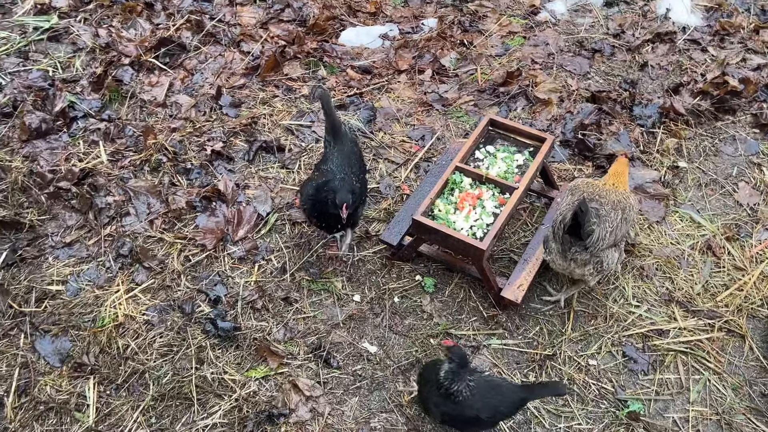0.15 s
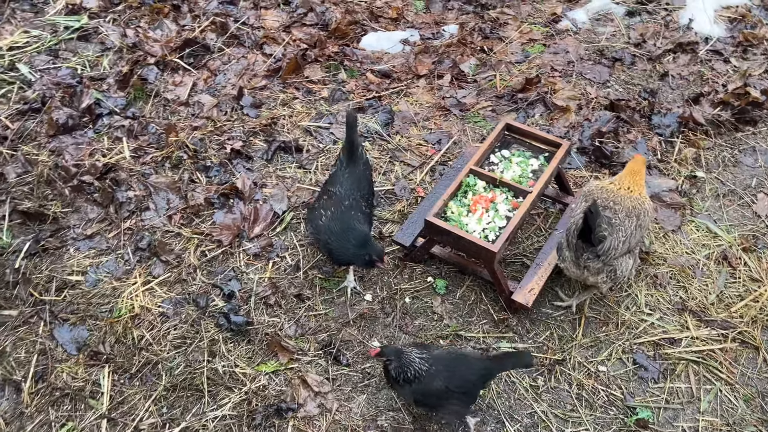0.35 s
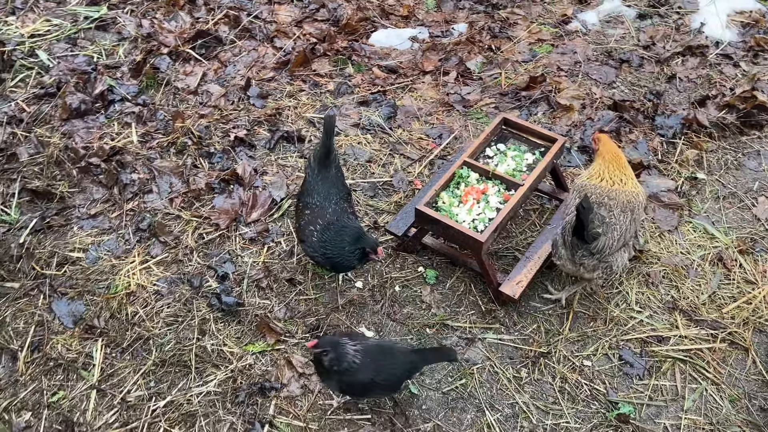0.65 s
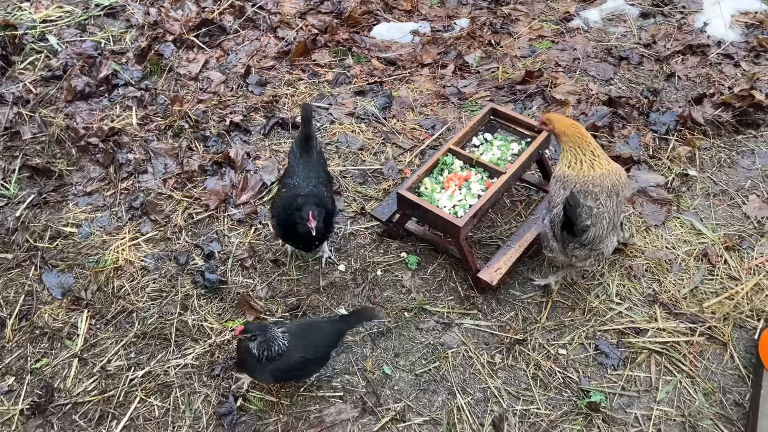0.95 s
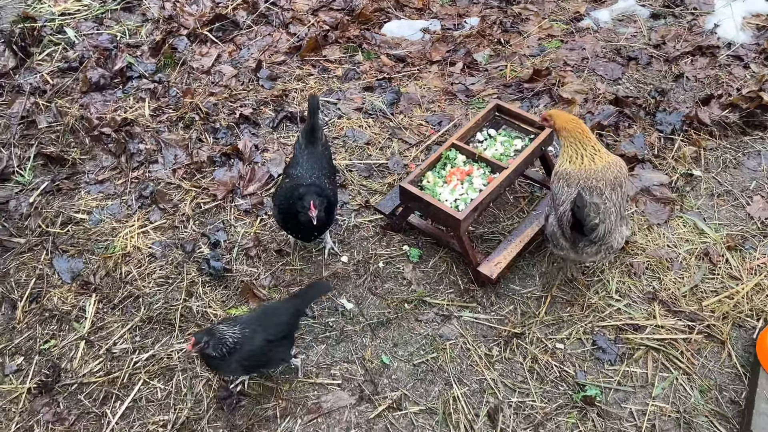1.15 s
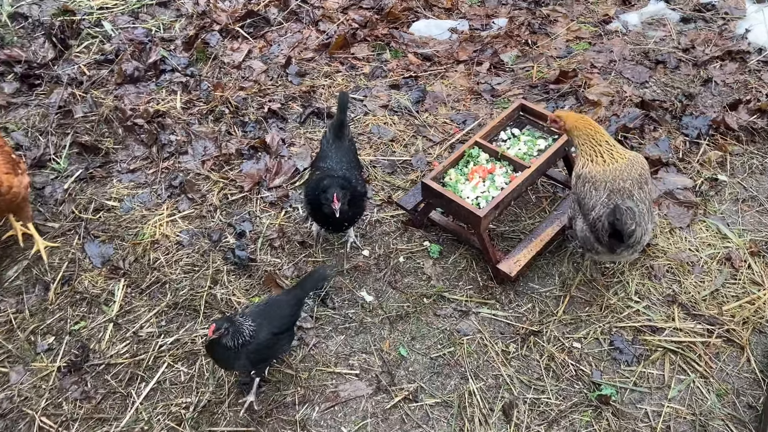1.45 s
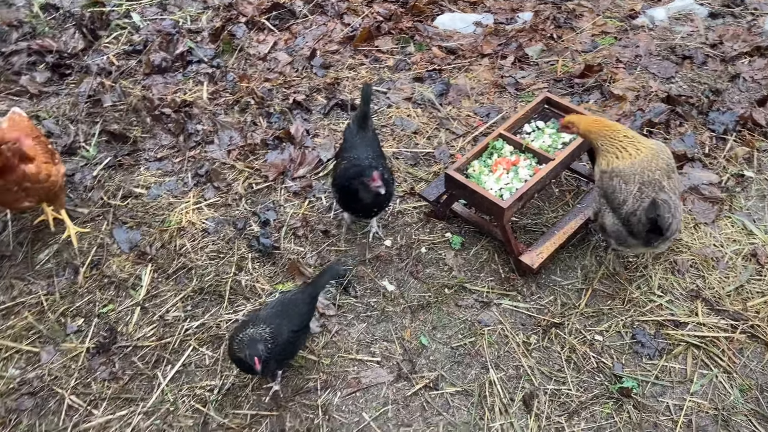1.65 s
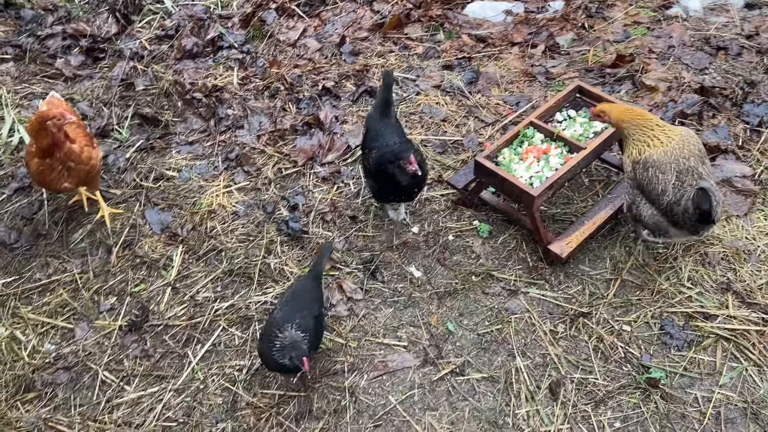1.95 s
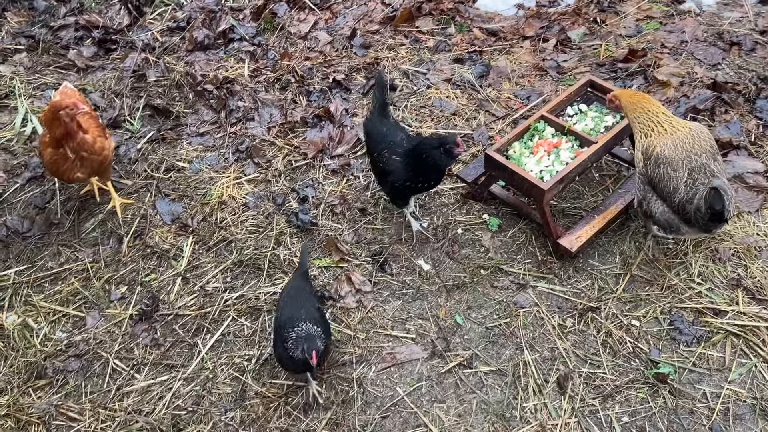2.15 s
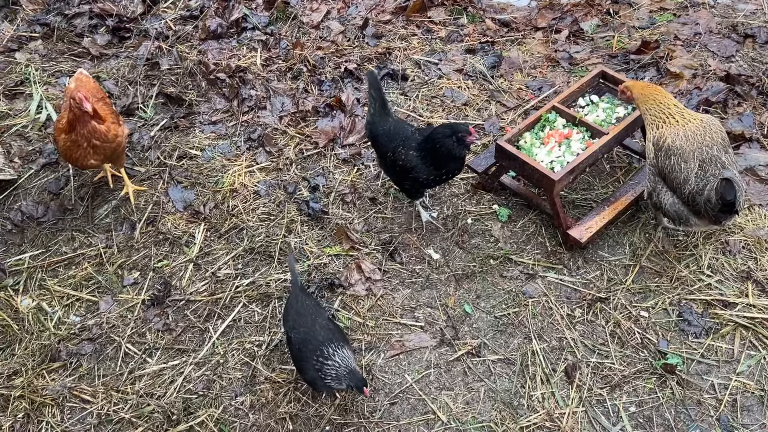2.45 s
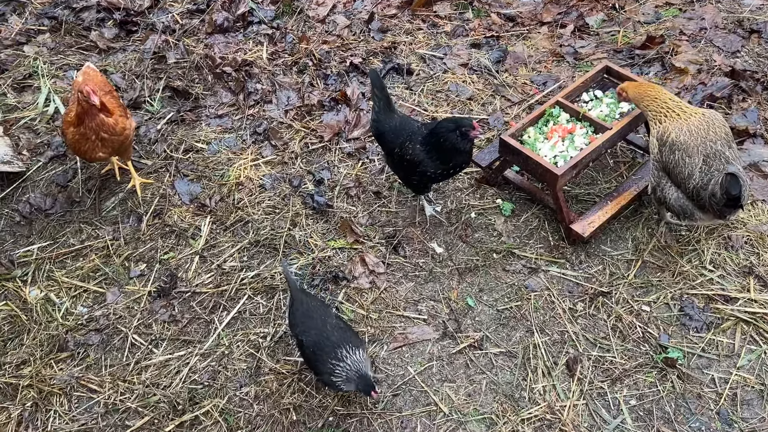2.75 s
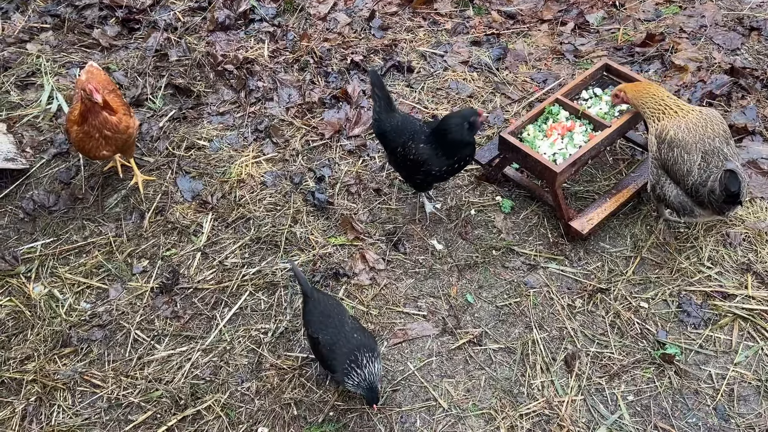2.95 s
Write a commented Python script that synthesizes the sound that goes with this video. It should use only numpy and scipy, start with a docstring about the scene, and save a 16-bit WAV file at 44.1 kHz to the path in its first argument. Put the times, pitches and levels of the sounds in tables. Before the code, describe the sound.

A nearby hen squawks twice, each low voice cracking into a long raspy squeal, after two faint bird whistles. Dull thumps and swelling low rumble accompany it outdoors, picked up in close stereo.

```python
"""Two thin whistles of a small far bird, towards the left, open over low outdoor noise that swells and sinks.
Then a close hen gives two squawks: low voice breaking into a rising squeal that catches and dips, with rasping air.
A second hen moans softly under the first squawk; dull thumps and a late bright tick sound in the yard.
Voices are sums of unsteady harmonics and half lines; thumps are decaying sines with noise; the rest,
apart from the whistled sines, is shaped noise."""
import sys
import numpy as np
from scipy import signal
from scipy.fft import rfft, irfft
from scipy.io import wavfile

SR = 44100
rng = np.random.default_rng(int(sys.argv[2]) if len(sys.argv) > 2 else 0)


def generate_wav(signal):
    """Clip the signal to [-1, 1] and save it as 16-bit WAV at the path in sys.argv[1]."""
    frames = np.transpose(np.atleast_2d(signal))
    scaled = np.clip(frames, -1, 1) * 32767
    pcm = np.round(scaled).astype(np.int16)
    wavfile.write(sys.argv[1], SR, pcm)


N = 136710
TIME = np.arange(N) / SR
CUTOFF_HZ = 15800


def scene():
    """The hens, the thumps, the tick, the far bird and the outdoor noise, in stereo."""
    return hen() + second_hen() + thumps() + ticks() + far_bird() + outdoors()


def hen():
    """Both squawks, the register cracks and the rasp, heard directly and as scatter from the yard."""
    calls = first_squawk() + second_squawk() + cracks() + rasp()
    return at_the_ports(calls) + yard(calls)


# Parts of the first squawk. Each row: time in s, pitch in Hz, level in dB, roughness 0-1.
OPENING_PART = [(.178, 543.7, -43, 0.13), (.255, 606, -36, 0.09), (.322, 640, -35.5, 0.17),
                (.333, 798, -31, 0.03), (.364, 837, -36.5, 0.56)]
HOARSE_PART = [(.368, 1226, -46, 0.37), (.42, 1051, -37, 0.31), (.495, 1262, -46, 0.52),
               (.533, 1264, -47.5, 0.29), (.56, 1129, -35.5, 0.09), (.62, 1249, -47, 0.59),
               (.688, 1293, -50.5, 0.29), (.702, 1129, -34.5, 0.51), (.72, 1325, -52, 0.36),
               (.76, 1360, -46, 0.57)]
FIRST_SQUEAL_PART = [(.765, 1348, -48.5, 0.57), (.83, 1317, -37.5, 0.15), (.89, 1358, -34, 0.044),
                     (1.19, 1386, -31, 0.1), (1.46, 1443, -30.5, 0.15), (1.61, 1464, -28, 0.19),
                     (1.675, 1419, -25.5, 0.08), (1.698, 1326, -29, .35)]
# Throat colour of each part. Each row: frequency in Hz, gain in dB.
OPENING_THROAT = [(600, -20), (1250, -2.5), (1650, 7.5), (1950, 1), (2600, 13), (8000, -34)]
HOARSE_THROAT = [(600, 18), (1150, 13), (2250, 15.5), (3500, -16), (7500, -58), (15000, -46)]
FIRST_SQUEAL_THROAT = [(700, -8), (1350, 9.5), (2750, -0.5), (4200, -12), (5600, -17), (6900, -9.5),
                       (8300, -26.5), (15000, -47.5)]
# Catches of both squeals: momentary pitch drops. Each row: centre in s, length in s.
SQUEAL_CATCHES = [(0.848, .012), (.922, .013), (1.131, 0.019), (1.232, .008), (1.269, 0.0079), (1.634, .01),
                  (1.646, 0.0076), (2.209, 0.0058), (2.259, 0.0094), (2.282, 0.021), (2.324, .015),
                  (2.344, 0.0086), (2.414, .028), (2.502, .009), (2.556, 0.0088), (2.595, 0.0068),
                  (2.631, 0.0074), (2.681, 0.014)]
WOBBLE = .016  # relative pitch deviation, rms before its upper limit


def first_squawk():
    """A low opening, a hoarse stretch and a squeal, each with its own throat resonance."""
    opening = voice(OPENING_PART, OPENING_THROAT, rag=1.0, fall_db=16.5, soft_dull=0.44)
    hoarse = voice(HOARSE_PART, HOARSE_THROAT, flutter_db=2.5, rag=1.44, wobble=WOBBLE)
    squeal = voice(FIRST_SQUEAL_PART, FIRST_SQUEAL_THROAT, SQUEAL_CATCHES,
                   flutter_db=0.52, rag=0.9, wobble=WOBBLE)
    return opening + hoarse + squeal


# Parts of the second squawk. Each row: time in s, pitch in Hz, level in dB, roughness 0-1.
CLUCK_PART = [(1.975, 650, -33, 0.17), (1.993, 766.7, -20.5, 0.26), (2.018, 804, -34.5, 0.51),
              (2.041, 1012, -43, 0.67), (2.049, 815.5, -26, .02), (2.104, 812.5, -28.5, 0.026),
              (2.114, 847, -25.5, 0.45)]
SECOND_SQUEAL_PART = [(2.111, 1648, -28, 0.86), (2.13, 1111, -37, .25), (2.154, 1153, -31.5, 0.12),
                      (2.162, 1323, -25.5, 0.28), (2.25, 1364, -24.5, 0.085), (2.3, 1459, -26, 0.3),
                      (2.36, 1453, -24.5, 0.025), (2.58, 1495, -25.5, 0.19), (2.773, 1511, -23.5, 0.12),
                      (2.782, 1273, -30.5, 0.12), (2.813, 1070, -27.5, 0.49)]
CLOSING_PART = [(2.806, 943, -35, 0.59), (2.825, 864, -23, 0.39), (2.836, 752, -44, 0.37)]
# Throat colour of the low voice and the squeal. Each row: frequency in Hz, gain in dB.
LOW_THROAT = [(400, -15), (800, 4.5), (1900, 9), (2450, -5), (3200, -31), (4900, -20), (8500, -25.5),
              (15000, -29.5)]
SECOND_SQUEAL_THROAT = [(700, -14.5), (1200, -1.5), (1500, 2), (2000, 1), (3000, -29.5), (4400, -24),
                        (6000, -39), (15000, -75)]


def second_squawk():
    """A low cluck, a squeal and a low closing; the low parts share one throat resonance."""
    cluck = voice(CLUCK_PART, LOW_THROAT, rag=0.44)
    squeal = voice(SECOND_SQUEAL_PART, SECOND_SQUEAL_THROAT, SQUEAL_CATCHES, flutter_db=1.15, rag=1.27)
    closing = voice(CLOSING_PART, LOW_THROAT, rag=0.68)
    return cluck + squeal + closing


# Period doubling, which adds half lines. Each row: centre in s, length in s, weight (halved in the line gain).
PERIOD_DOUBLINGS = [(1.304, 0.044, 0.37), (1.427, 0.035, 1), (1.574, 0.039, 1.5), (2.178, 0.03, 0.56),
                    (2.31, 0.033, 0.53), (2.576, 0.028, .3)]
ROUGH_UNDERTONE = .4  # half-line weight per roughness
EDGE_S = .004
CATCH_HZ, CATCH_DB, CATCH_ROUGH = 195.9, -2, 0.023  # pitch drop, level change, added roughness
WOBBLE_HZ = 45
WAVER, WAVER_HZ = 0.0083, 70.6  # relative pitch, per rag
JITTER, JITTER_HZ = 0.0639, 303  # relative pitch, per roughness
SHIMMER, SHIMMER_HZ = .6, 380  # relative amplitude, per roughness
DRIFT_DB, DRIFT_HZ = 2.8, 30  # level drift of each line above the fundamental
RAG_PER_HARMONIC, RAG_HZ, FLUTTER_HZ = .55, 130, 50


def voice(part, colour, catches=(), flutter_db=0, rag=0, fall_db=0, wobble=0, soft_dull=0):
    """Harmonics of an unsteady syrinx, coloured by the throat; half lines and upper partials are most ragged."""
    times, *columns = np.transpose(part)
    on = (TIME > times[0] - EDGE_S) & (TIME < times[-1] + EDGE_S)
    t = TIME[on]
    hz, db, rough = (np.interp(t, times, c) for c in columns)
    fall = fall_db + soft_dull * (db.max() - db)  # dB per harmonic: a softer voice is duller
    half = ROUGH_UNDERTONE * rough
    for s, length, weight in PERIOD_DOUBLINGS:
        half = half + weight * bump(t, s, length)

    for s, length in catches:
        u = 2 * (t - s) / length
        dip = np.exp(-abs(u) ** np.where(u > 0, 6, 2))  # eases in, snaps back
        hz = hz - CATCH_HZ * dip
        db = db + CATCH_DB * dip
        rough = rough + CATCH_ROUGH * dip
    hz = hz * (1 + wobble * np.minimum(wander(WOBBLE_HZ)[on], 1))  # slips further down than up
    waver = WAVER * rag * wander(WAVER_HZ)[on]
    jitter = JITTER * rough * wander(JITTER_HZ)[on]
    turns = np.cumsum(hz * (1 + waver + jitter)) / SR

    drift, scatter = wander(DRIFT_HZ), wander(RAG_HZ)
    tone, power = 0, 0
    for k in np.arange(1, 41) / 2:
        is_half_line = k % 1 > 0
        swell_db = DRIFT_DB * np.roll(drift, rng.integers(N))[on] * (k > 1)
        gain = amp(read(colour, k * hz) - fall * k + swell_db) * (k * hz < CUTOFF_HZ)
        if is_half_line:
            gain = gain * half / 2
            blur = rough * 2
        else:
            blur = rag * RAG_PER_HARMONIC * (k - 1) * np.sqrt(abs(rough))
        blur = np.clip(blur, 0, 1)
        a, b = (np.roll(scatter, rng.integers(N))[:len(t)] for _ in range(2))
        line = np.sqrt(1 - blur ** 2) + blur * (a + 1j * b) / np.sqrt(2)  # steady to random
        spin = np.exp(2j * np.pi * (k * turns + rng.random() / 2))
        tone = tone + gain * (line * spin).real
        power = power + gain ** 2 / 2

    shimmer = 1 + SHIMMER * rough * wander(SHIMMER_HZ)[on]
    flutter = amp(flutter_db * wander(FLUTTER_HZ)[on])
    edges = np.clip(np.minimum(t - t[0], t[-1] - t) / EDGE_S, 0, 1)
    out = np.zeros(N)
    out[on] = tone / np.sqrt(power) * shimmer * flutter * amp(db) * edges
    return out


# Cracks where the voice changes register. Each row: centre in s, pitch in Hz, level in dB.
REGISTER_CRACKS = [(.17, 788, -38.5), (.769, 1640, -42.5), (.803, 1580, -37.5), (2.038, 2010, -31)]
CRACK_S, CRACK_JITTER = .016, 0.06  # length, relative pitch rms


def cracks():
    """Short sine notes with randomly jittered pitch."""
    out, t = np.zeros(N), np.arange(-CRACK_S, CRACK_S, 1 / SR)
    for s, hz, db in REGISTER_CRACKS:
        turns = np.cumsum(hz * (1 + CRACK_JITTER * wander(JITTER_HZ)[:len(t)])) / SR
        note = unit(np.sin(2 * np.pi * turns))
        add(out, s - CRACK_S, amp(db) * bump(t, 0, CRACK_S) * note)
    return out


# Air rushing through the beak. Each row: frequency in Hz, relative level in dB.
RASP_SPECTRUM = [(600, 3), (1900, 18.5), (2800, 13), (4500, 7), (7000, 6), (9000, -10.5), (15500, -6)]
# Level of that rush before flutter. Each row: time in s, level in dB.
RASP_CURVE = [(.3, -58.5), (.66, -49.5), (1.45, -50.5), (1.69, -43), (1.72, -58.5), (1.96, -66.5),
              (1.985, -47), (2.09, -57), (2.17, -49.5), (2.82, -45.5), (2.85, -55.5)]


def rasp():
    """Turbulent air: shaped noise following the squawks, with a random 2 dB rms flutter."""
    return noise(RASP_SPECTRUM) * level(RASP_CURVE) * amp(2 * wander(74))


# Delay of the right microphone port. Each row: frequency in Hz, delay in s.
PORT_LAG = [(1500, 0.00012), (4000, 0.000247)]
# Port balance for the hen. Each row: frequency in Hz, left minus right in dB.
PORT_BALANCE = [(800, -2.5), (1500, -7), (3000, -6.5), (5600, 21.5), (6900, 9), (9000, 0)]


def at_the_ports(x):
    """The sound reaches the right microphone port later and with another colour."""
    hz = np.fft.rfftfreq(N, 1 / SR)
    ratio = amp(read(PORT_BALANCE, hz))
    lag = np.exp(-2j * np.pi * hz * read(PORT_LAG, hz))
    ports = np.array([ratio, lag]) * np.sqrt(2 / (1 + ratio ** 2))  # keeps the summed power
    return irfft(rfft(x) * ports, N)


YARD_DB, YARD_T60_S = -11, 0.11


def yard(x):
    """Short scatter from the ground and the surroundings: convolution with decaying stereo noise."""
    t = TIME[:SR // 2]
    tail = rng.standard_normal((2, len(t))) * amp(-60 * t / YARD_T60_S) * (t > .004)
    tail = tail / np.linalg.norm(tail[0])
    return amp(YARD_DB) * signal.fftconvolve(x[None], tail, axes=1)[:, :N]


# Moan of the second hen. Each row: time in s, pitch in Hz, level in dB, roughness 0-1.
MOAN_PART = [(.37, 447, -56, .04), (.5, 472, -47.5, .04), (.69, 427.3, -48.5, 0.043)]
# Its throat colour. Each row: frequency in Hz, gain in dB.
MOAN_THROAT = [(450, 8), (900, 0.5), (4000, -70)]


def second_hen():
    """A soft low moan from the same voice mechanism, centred and without scatter."""
    return voice(MOAN_PART, MOAN_THROAT)


# Dull thumps. Each row: start in s, drive in dB, pitch in Hz, decay time constant in s.
THUMP_BLOWS = [(1.329, -21, 62.3, 0.027), (1.365, -19, 63.2, 0.069), (1.386, -27, 120.1, 0.015),
               (1.516, -24, 92, 0.042), (1.589, -24, 89.9, 0.011), (1.853, -22, 75, 0.03),
               (1.926, -18, 165.5, 0.019), (1.992, -23.5, 242, 0.0097), (2.032, -23, 207.6, 0.02),
               (2.211, -28.5, 139, 0.048), (2.266, -27, 190, 0.049), (2.366, -29.5, 215, 0.055)]
THUMP_RISE_S, THUMP_WIDTH = 0.0033, 0.57  # WIDTH: scuff band edge as a ratio to the pitch
THUMP_SWING, THUMP_SCUFF = 0.41, 0.66  # gains


def thumps():
    """Soft low blows: a heavily damped swing with a dull scuff in it."""
    out, t = np.zeros(N), TIME[:SR // 4]
    for s, db, hz, decay_s in THUMP_BLOWS:
        band = [(hz / 4, -18), (hz * THUMP_WIDTH, 0), (hz / THUMP_WIDTH, -2), (hz * 3, -24), (hz * 20, -100)]
        scuff = noise(band)[:len(t)]
        swing = np.sin(2 * np.pi * hz * t)
        decay = np.exp(-np.maximum(t - THUMP_RISE_S, 0) / decay_s)
        envelope = np.minimum(t / THUMP_RISE_S, 1) * decay
        add(out, s, amp(db) * envelope * (THUMP_SWING * swing + THUMP_SCUFF * scuff))
    return out


# A peck or a snapping straw. Each row: start in s, level in dB.
TICK_EVENTS = [(2.954, -45)]
# Its spectrum. Each row: frequency in Hz, relative level in dB.
TICK_SPECTRUM = [(4000, -8), (7000, 3), (15000, -13)]
TICK_DECAY_S = 0.001


def ticks():
    """A tiny bright snap: noise with exponential decay."""
    out, t = np.zeros(N), TIME[:SR // 20]
    for s, db in TICK_EVENTS:
        add(out, s, amp(db) * np.exp(-t / TICK_DECAY_S) * noise(TICK_SPECTRUM)[:len(t)])
    return out


# Small far bird. Each row: start in s, length in s, pitch in Hz, level in dB before panning.
BIRD_CHIRPS = [(.035, .045, 5800, -58), (.1, .09, 4920, -55)]


def far_bird():
    """Thin whistles towards the left: sines with wavering pitch under a half-sine envelope."""
    out = np.zeros(N)
    for s, length, hz, db in BIRD_CHIRPS:
        t = np.arange(0, length, 1 / SR)
        turns = np.cumsum(hz * (1 + .007 * wander(150)[:len(t)])) / SR
        add(out, s, amp(db) * np.sin(np.pi * t / length) * np.sin(2 * np.pi * turns))
    return out * amp([[3], [-8]])  # left, right dB


# Level of the low rumble. Each row: time in s, level in dB.
RUMBLE_CURVE = [(0, -43), (1.2, -41.5), (1.7, -36), (2.65, -38.5), (3.1, -51.5)]
# Spectrum of the rumble, then of the outdoor wash. Each row: frequency in Hz, relative level in dB.
RUMBLE_SPECTRUM = [(20, -32.5), (45, -15.5), (64, 1), (80, -5), (115, -12), (300, -27), (2000, -79)]
AIR_SPECTRUM = [(30, 2), (450, 3), (780, 7.5), (2000, -11), (3000, -27.5), (4500, -22), (9000, -56),
                (15000, -26)]
AIR_DB, AIR_SAME = -48.5, 0.14  # SAME: power share common to both channels


def outdoors():
    """A low noise rumble, almost the same in both ears, under a wide soft noise wash."""
    rumble_sides = np.array([noise(RUMBLE_SPECTRUM), noise(RUMBLE_SPECTRUM)])
    rumble = noise(RUMBLE_SPECTRUM) + 0.22 * rumble_sides
    air_sides = np.array([noise(AIR_SPECTRUM), noise(AIR_SPECTRUM)])
    air = np.sqrt(AIR_SAME) * noise(AIR_SPECTRUM) + np.sqrt(1 - AIR_SAME) * air_sides
    return rumble * level(RUMBLE_CURVE) + air * amp(AIR_DB + 0.27 * wander(18))


def amp(db):
    """Decibels to gain."""
    return 10 ** (np.asarray(db) / 20)


def unit(x):
    """Scales to an rms of one."""
    return x / np.sqrt(np.mean(x ** 2) + 1e-20)


def read(points, hz):
    """Reads a curve on a log-frequency axis."""
    f, value = np.transpose(points)
    return np.interp(np.log(hz + 1), np.log(f), value)


def level(points):
    """Gain over time from a curve in dB."""
    return amp(np.interp(TIME, *np.transpose(points)))


def add(mix, s, sound):
    """Mixes a sound in at time s."""
    part = mix[max(round(s * SR), 0):][:len(sound)]
    part += sound[:len(part)]


def noise(colour):
    """Noise of unit rms with the given spectrum."""
    gain = amp(read(colour, np.fft.rfftfreq(N, 1 / SR)))
    return unit(irfft(rfft(rng.standard_normal(N)) * gain, N))


def wander(hz):
    """Random motion of unit rms, mostly slower than the given rate."""
    gain = 1 / (1 + (np.fft.rfftfreq(N, 1 / SR) / hz) ** 4)
    return unit(irfft(rfft(rng.standard_normal(N)) * gain, N))


def bump(t, s, length):
    """A rounded, flat-topped hump of height one, centred on s."""
    return np.exp(-abs(2 * (t - s) / length) ** 6.8)


def record(dry):
    """The recorder's band limit: a linear-phase low-pass."""
    lowpass = signal.firwin(511, CUTOFF_HZ, window=("kaiser", 9), fs=SR)
    return signal.oaconvolve(dry, lowpass[None], "same")


dry = scene()
out = record(dry)
generate_wav(out)
```